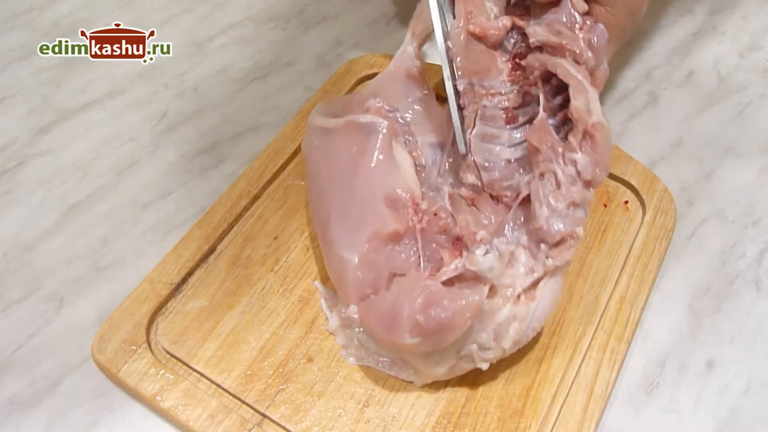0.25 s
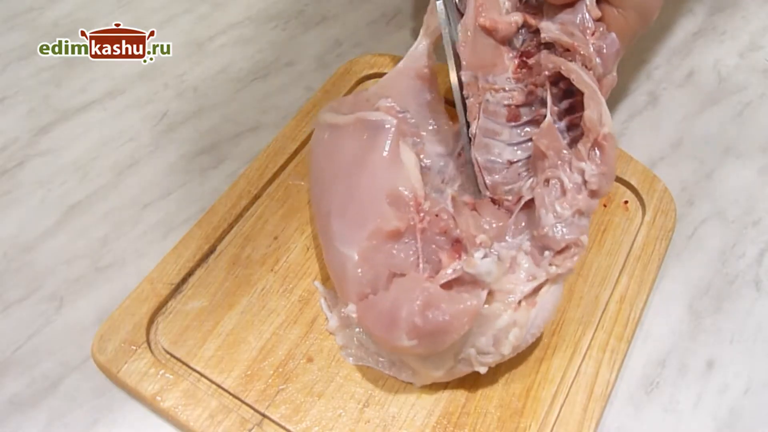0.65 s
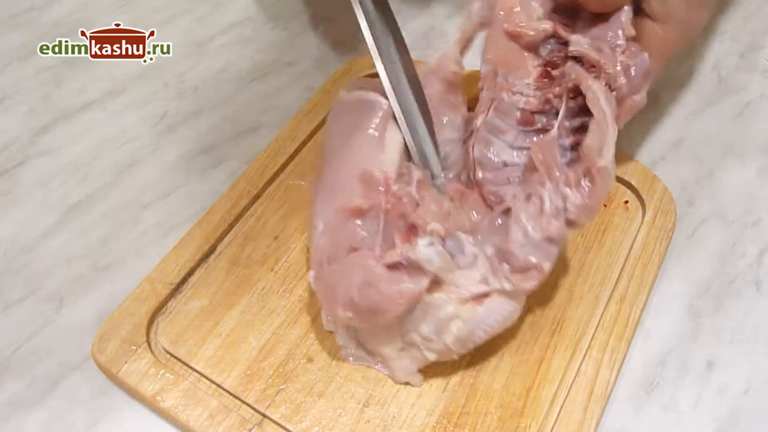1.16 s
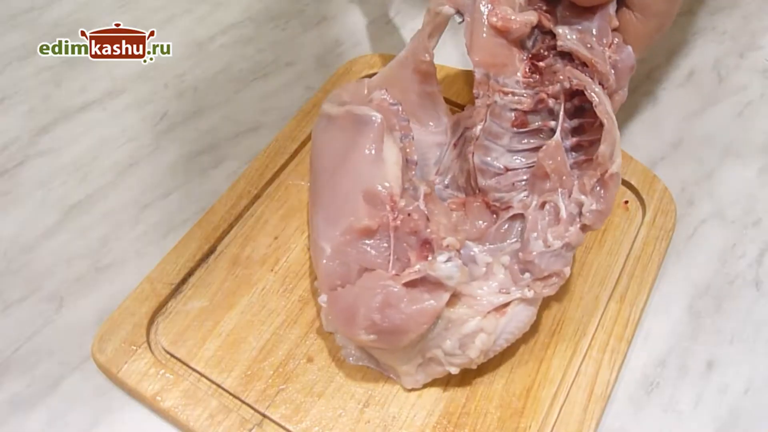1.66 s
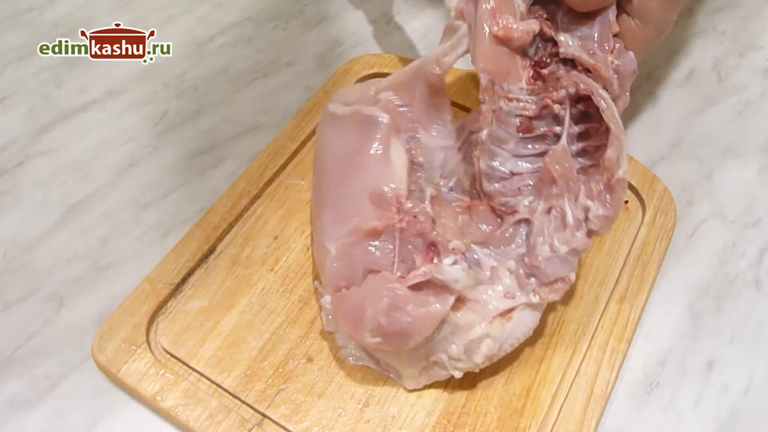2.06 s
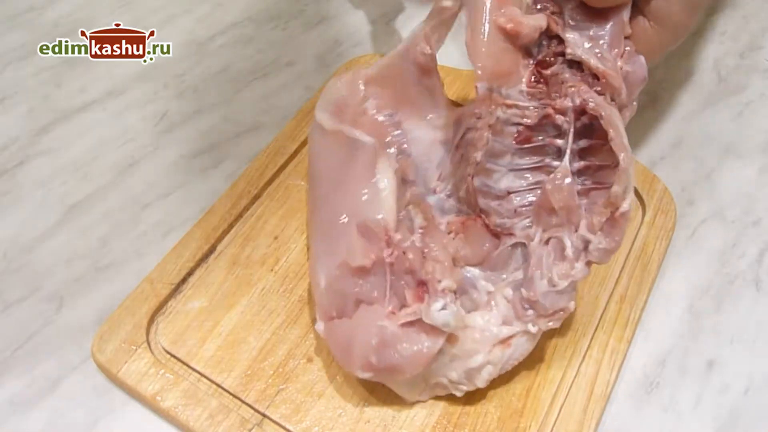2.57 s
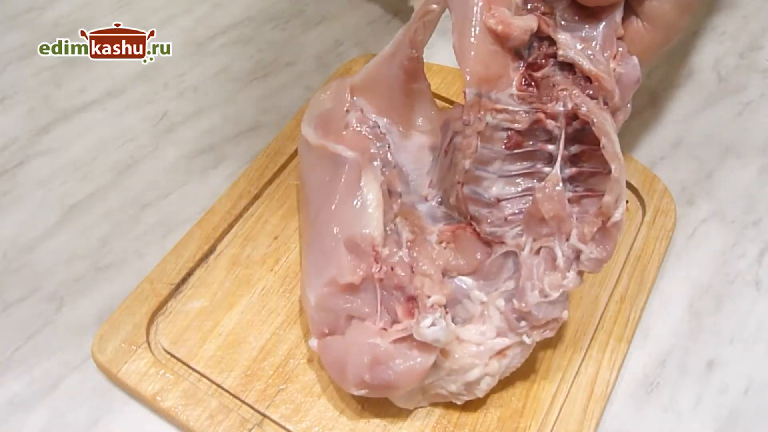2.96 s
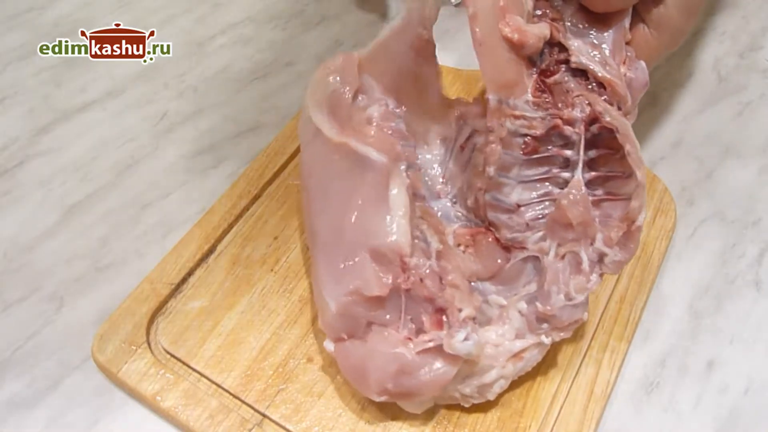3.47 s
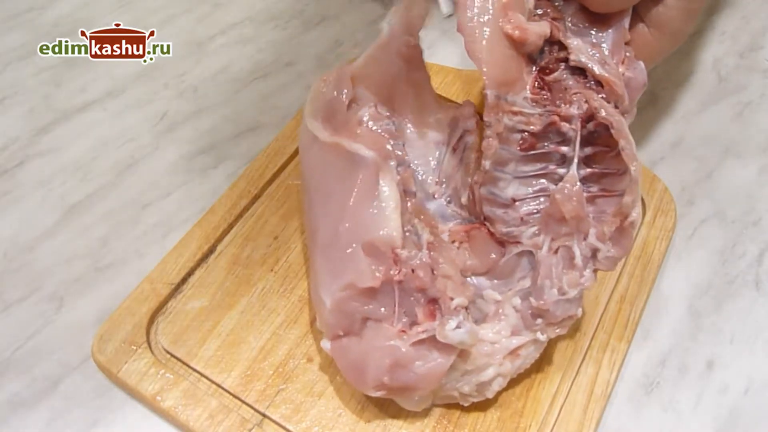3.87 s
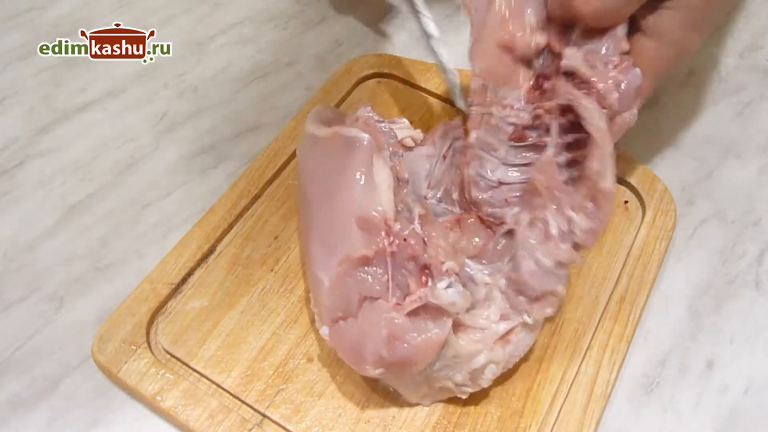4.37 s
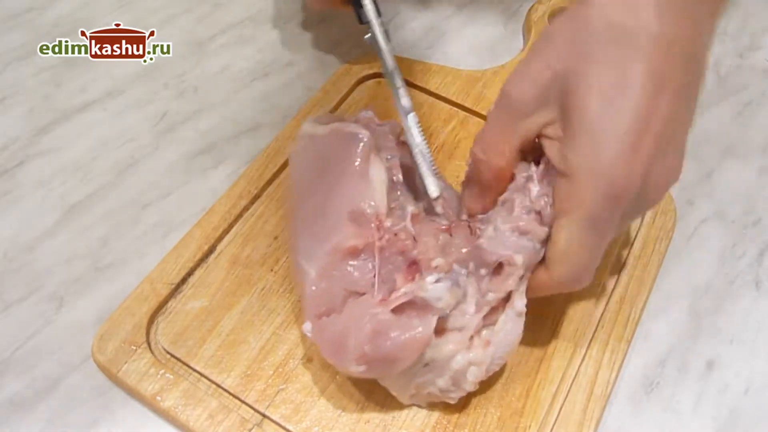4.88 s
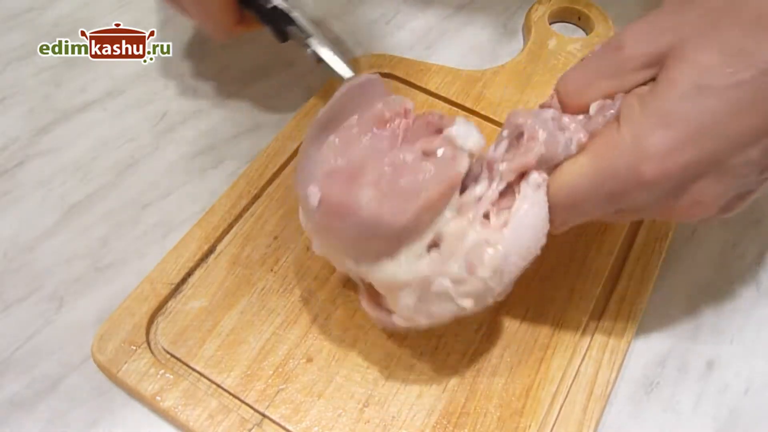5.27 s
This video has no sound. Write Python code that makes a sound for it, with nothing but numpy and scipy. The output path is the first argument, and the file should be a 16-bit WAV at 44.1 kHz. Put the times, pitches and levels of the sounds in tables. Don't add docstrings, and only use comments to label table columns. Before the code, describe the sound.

Kitchen scissors crunch loudly through raw chicken ribs in a hard, live kitchen, then wet flesh is pulled apart with small pops and crackles.

```python
import sys
import numpy as np
from scipy import signal
from scipy.fft import rfft, irfft
from scipy.io import wavfile
from scipy.ndimage import uniform_filter1d

SR = 44100
rng = np.random.default_rng(int(sys.argv[2]) if len(sys.argv) > 2 else 0)


def amplitude_ratio(level_db):
    exponent = np.asarray(level_db, float) / 20
    return 10 ** exponent


def wav_record(signal):
    frames = np.transpose(np.atleast_2d(signal))
    bounded = np.clip(frames, -1, 1)
    quanta = np.round(bounded * 32767).astype(np.int16)
    wavfile.write(sys.argv[1], SR, quanta)


N = 243414


def evened(x):
    return x / np.sqrt(np.mean(x ** 2) + 1e-20)


def read(points, hz):
    f, value = np.transpose(points)
    return np.interp(np.log(hz + 1), np.log(f + 1), value)


def add(mix, s, sound):
    part = mix[..., round(s * SR):][..., :sound.shape[-1]]
    part += sound[..., :part.shape[-1]]


def resonate(x, hz, width):
    pole = np.exp((2j * np.pi * hz - np.pi * max(width, 5)) / SR)
    return 2 * signal.lfilter([1 - abs(pole)], [1, -pole], x).real


def slow(hz):
    return evened(signal.lfilter([1], [1, -np.exp(-2 * np.pi * hz / SR)], rng.standard_normal(N)))


def whitened(x, bins):
    spectrum = rfft(x)
    return irfft(spectrum / np.sqrt(uniform_filter1d(abs(spectrum) ** 2, size=bins)))


def swell(source, start, top, end, db, start_db, end_db):
    at = np.arange(round(start * SR), min(round(end * SR), N))
    level = db + np.interp(at / SR, [start, top, end], [start_db, 0, end_db])
    return source[at] * amplitude_ratio(level) * signal.windows.tukey(len(at), .3)


def causal(shared, low_hz, low_db, high_hz, high_db, thud_db, deep_db, treble_db, upper_hz, upper_db, size=1024):
    low_oct, high_oct, thud_hz, deep_hz, treble_hz = 0.28, 0.19, 800, 150, 7220
    hz = abs(np.fft.fftfreq(4 * size, 1 / SR)) + 1
    db = read(shared, hz) + thud_db / (1 + (hz / thud_hz) ** 2)
    db = db + deep_db / (1 + (hz / deep_hz) ** 2) + treble_db / (1 + (treble_hz / hz) ** 14)
    rings = [(low_hz, low_db, low_oct), (high_hz, high_db, high_oct), (upper_hz, upper_db, high_oct)]
    for ring_hz, ring_db, octaves in rings:
        db = db + ring_db * np.exp(-(np.log2(hz / ring_hz) / octaves) ** 2)
    log_gain = np.log(amplitude_ratio(np.maximum(db, -70)))
    return np.fft.ifft(np.exp(np.conj(signal.hilbert(log_gain)))).real[:size]


# t/s, peak level/dB, fracture length/ms, room share level/dB, left-right level/dB
FRACTURES = [
    (0.5962, -0.16, 4.04, -7, 0),
    (0.9264, -1.75, 3.47, -6, 1),
    (1.9325, -1.5, 3.5, -6.5, -0.7),
    (2.6774, -9, 1.18, -14, -4),
    (3.515, -8.5, 3.5, -7.5, 1.5),
    (3.9102, -1, 3.44, -8, 1.5),
    (0.2675, -22, 4.1, -9.5, -0.5),
    (4.5303, -26.5, 0.89, -4.5, -0.5),
    (5.2524, -15, 2.9, -12, -5),
]
# f/Hz, level/dB per Hz
CRACK_COLOUR = [(24, -62), (40, -38.5), (500, -18.5), (1300, -15.5), (2750, -13.5), (5500, -9), (7500, -6),
                (10100, -39)]
# low ring f/Hz, level/dB, high ring f/Hz, level/dB, thud level/dB
CRACK_RINGS = [(3000, 12, 4230, 18, 14), (2130, 10.5, 3400, 9, -7), (1570, 7.5, 4400, 7.5, -1.5),
               (1980, 12, 3290, 10.5, 8.5), (2030, 11, 4600, 9, -16.5), (2220, 7, 4340, 15.5, -0.5),
               (1000, 9.5, 3700, 8.5, 19.5), (1780, 32, 2860, 22, 25), (1270, 8, 3660, 9.5, 12.5)]
# f/Hz, level/dB per Hz
RIB_COLOUR = [(300, -60), (650, -45), (1100, -21.5), (1600, -14), (2750, -18.5), (4000, -6.5), (7700, -14),
              (10000, -46.5)]
# low ring f/Hz, level/dB, high ring f/Hz, level/dB, thud level/dB
RIB_RINGS = [(1920, 4.5, 4200, 7, -2.5), (2100, 6.5, 3700, 3.5, -1), (1920, 6, 4320, 3.5, -5.5),
             (2700, 17, 4200, -3, 49.5), (1905, 7.5, 5300, 5.5, 0.5), (2200, 5, 4500, 3, 2),
             (1200, 8, 2700, 5, 40.5), (1385, 29, 2050, 25, 14.5), (1500, 2, 4300, 0, 23)]
# deep bass level/dB, crack treble level/dB, rib treble level/dB, upper ring f/Hz, level/dB
FRACTURE_EDGES = [(6.5, -6, -3.5, 7000, 9), (3.5, 4, -1, 4700, 4.5), (-16, -5.5, 1.5, 7500, 5.5),
                  (-43, -28.5, -6, 4900, 9), (-2, 2, -1, 6400, 3.5), (4, -2.5, 0.5, 6600, 5),
                  (-35.5, -17, -2, 4900, 5.5), (-23.5, -30, -10, 4800, -13), (-30, -17, -8, 5600, 10)]
# f/Hz, width/Hz, level/dB
STEEL_MODES = [(2270, 70, -9.5), (3690, 110, -6.5), (4330, 45, -2.5), (5190, 38, -7.5), (5880, 130, -2.5),
               (6190, 40, -7), (6800, 75, -3)]


def snaps():
    bounce_db, bounce_ms = -15, (.5, .8)
    near, far = np.zeros((2, N)), np.zeros(N)
    t = np.arange(2048) / SR
    for row, crack, rib, edges in zip(FRACTURES, CRACK_RINGS, RIB_RINGS, FRACTURE_EDGES):
        s, db, length_ms, wet_db, pan_db = row
        deep_db, treble_db, rib_db, upper_hz, upper_db = edges
        u = t * 1000 / length_ms
        noise = rng.standard_normal(len(t)) * np.minimum(u * 9, 1) * np.exp(-.6 * u - u ** 5)
        burst = whitened(noise, 15)[:len(t) // 2]
        sound = np.convolve(burst, causal(CRACK_COLOUR, *crack, deep_db, treble_db, upper_hz, upper_db))
        ms = np.arange(len(sound)) / SR * 1000
        sound *= np.exp(-(ms / (1.6 * length_ms)) ** 4)
        sound *= amplitude_ratio(min(db, -.6)) / abs(band_edge(sound)).max()
        bounce = amplitude_ratio(bounce_db) * np.array([np.roll(sound, round(d * SR / 1000)) for d in bounce_ms])
        add(near, s, (sound + bounce) * amplitude_ratio([[min(pan_db, 0)], [min(-pan_db, 0)]]))
        ring = causal(RIB_COLOUR, *rib, 0, rib_db, upper_hz, 0.54 * upper_db, size=len(t))
        ring = ring + sum(amplitude_ratio(g + 6.5) * resonate(ring, f, w) for f, w, g in STEEL_MODES)
        add(far, s, amplitude_ratio(wet_db) * ring * np.linalg.norm(sound) / np.linalg.norm(ring))
    return near, far


# start t/s, contact t/s, end t/s, high song level/dB, 2.4 kHz song relative
# level/dB
BITES = [
    (0.559, 0.58, 0.64, -44.5, 1),
    (0.873, 0.896, 0.98, -48.5, -7.5),
    (1.859, 1.904, 1.932, -43.5, -10),
    (3.863, 3.892, 3.904, -44.5, -5.5),
]
# start t/s, hardest t/s, end t/s, high song level/dB, 2.4 kHz song relative level/dB
STROKES = [
    (0.05, 0.081, 0.2, -56, -1.5),
    (0.185, 0.212, 0.3, -53, -0.5),
    (0.252, 0.257, 0.28, -52, -4),
    (0.339, 0.375, 0.43, -51, -9.5),
    (.72, 0.74, .81, -48, -7),
    (3.342, 3.41, 3.455, -49, -6.5),
    (3.401, 3.407, 3.435, -47, -8),
    (4.049, 4.098, 4.12, -48.5, -6.5),
]
# f/Hz, width/Hz, level/dB
BLADE_MODES = [(4680, 170, 1.5), (5774, 150, 4), (6070, 550, -4.5), (6250, 50, -7.5), (7040, 82, -14.5)]


def strokes():
    grit = rng.standard_normal(N) * amplitude_ratio(2.7 * slow(150))
    modes = sum(amplitude_ratio(db + 0.77 * slow(25)) * resonate(grit, hz, 1.2 * w) for hz, w, db in BLADE_MODES)
    high = evened(modes + 0.055 * grit + .25 * resonate(grit, 3800, 700))
    song = evened(resonate(grit, 2370, 140) * amplitude_ratio(3.6 * slow(24)))
    scrape = evened(resonate(resonate(grit, 1000, 700), 1000, 820))
    out = np.zeros(N)
    follow, scrape_db = .7, -62.5
    for rows, start_db, end_db in [(STROKES, -21, -19), (BITES, -24, 4.5)]:
        for *span, db, song_db in rows:
            add(out, span[0], swell(high, *span, db, start_db, end_db))
            add(out, span[0], swell(scrape, *span, scrape_db, -6.5, -2))
            add(out, span[0], swell(song, *span, db + song_db, follow * start_db, follow * end_db))
    return out


def impacts(rows, t60, share, air):
    out, t = np.zeros(N), np.arange(1500) / SR
    fade = amplitude_ratio(-30 * t / np.clip(t60, .003, .05))
    for s, db, hz, knock_db in rows:
        noise = rng.standard_normal(len(t))
        burst = whitened(noise * fade * np.minimum(t / (0.046 * t60), 1), 9)
        mode = resonate(resonate(burst, hz, share * hz), hz, 1.4 * share * hz)
        body = fade * (mode + air * np.diff(burst, prepend=0))
        knock = fade * resonate(resonate(burst, 950, 1000), 820, 690)
        sound = body / abs(body).max() + amplitude_ratio(knock_db - 2.5) * knock / abs(knock).max()
        add(out, s, amplitude_ratio(db - 1.5) * sound)
    return out


# t/s, peak level/dB, f/Hz, low knock level/dB
BONE_TICKS = [(.106, -31, 2370, -2), (.11, -30, 2270, -4.5), (.148, -33, 1790, -23),
              (.216, -31.5, 2380, -27), (0.2596, -27, 1000, -9), (0.2632, -22.5, 3500, -27),
              (.305, -39.5, 4000, -11), (.426, -33.5, 1900, -21), (0.572, -25, 4300, -8.5),
              (1.165, -43, 1630, -19), (1.261, -35, 4690, -33.5), (1.609, -33.5, 4560, -11.5),
              (3.893, -23, 5130, -15.5), (4.414, -40.5, 4900, -15.5), (4.435, -41.5, 5800, -23.5),
              (4.505, -40, 6500, -22), (4.589, -34.5, 4270, -7.5), (4.764, -33.5, 1810, -36),
              (4.82, -46, 3140, -16), (4.8407, -26.5, 3000, -35), (4.912, -36, 1770, -10),
              (5.062, -35.5, 5520, -10), (5.144, -31, 3630, -11.5), (5.213, -35, 4900, -17),
              (5.445, -32, 3460, -8)]


def bone_ticks():
    return impacts(BONE_TICKS, t60=.016, share=0.94, air=0.055)


# t/s, peak level/dB, f/Hz, low knock level/dB
BLADE_PINGS = [(.228, -30.5, 5430, -2), (0.5799, -17.5, 6100, -10.5), (0.59, -35, 6400, 2),
               (.744, -42, 6230, -27), (0.782, -36, 6050, -20), (1.079, -37.5, 6300, -24.5),
               (1.665, -32, 5670, -23.5), (1.921, -28, 5840, -25), (2.223, -41.5, 4570, -13),
               (2.365, -37.5, 5910, -4.5), (3.408, -27.5, 4630, -27), (5.032, -24, 5500, -15),
               (5.133, -32.5, 5660, -8), (5.159, -33, 6200, -13), (5.196, -26.5, 7020, -36),
               (5.348, -38.5, 3800, -25), (4.155, -28, 3770, -28.5), (5.216, -30, 4700, -22),
               (.2165, -33, 5600, -19.5), (1.2607, -38, 4700, -30), (1.6098, -34.5, 4500, -30),
               (3.702, -46, 6000, -25.5), (3.378, -40, 6800, -30.5)]


def blade_pings():
    return impacts(BLADE_PINGS, t60=0.0099, share=0.19, air=0.035)


# t/s, peak level/dB, f/Hz
WET_POPS = [(4.424, -38.5, 3030), (4.85, -37, 3530), (4.862, -32.5, 3450), (4.885, -34.5, 3530),
            (4.902, -31, 5760), (4.943, -36, 4700), (4.952, -27.5, 6500), (4.956, -25, 4030),
            (5.028, -29.5, 4670), (5.096, -37, 3180), (5.106, -30, 4940), (5.117, -25, 3300),
            (5.249, -25.5, 5600), (5.467, -24, 7200), (4.93, -36, 3500), (5.014, -39, 3400),
            (5.047, -43, 6500), (5.076, -36, 2500), (5.089, -36, 4530), (5.168, -40, 7000),
            (5.176, -43, 7000), (5.184, -39, 5000), (5.239, -32, 6540), (5.463, -40, 2500),
            (5.514, -40, 5060), (.0625, -42, 4000), (.071, -40, 6500), (3.13, -46, 7000),
            (4.22, -46.5, 5550), (.555, -38.5, 6200)]


def wet_pops():
    return impacts([(*row, -31) for row in WET_POPS], t60=0.013, share=0.56, air=0.11)


# t/s, crackle level/dB
PULLS = [
    [(1.05, -52.5), (1.2, -54)],
    [(4.38, -62.5), (4.7, -61.5)],
    [(4.8, -67.5), (5.078, -49), (5.52, -63)],
]


def crackle():
    t, pops = np.arange(300) / SR, np.zeros(N)
    for hz in np.geomspace(2200, 7400, num=14):
        happens = rng.random(N) < 150 / SR
        size = amplitude_ratio(4.7 * np.minimum(rng.exponential(1, N), 4)) * happens
        pops += signal.oaconvolve(size, np.sin(2 * np.pi * hz * t) * np.exp(-t * hz / 3.0))[:N]
    level = np.zeros(N)
    for rows in PULLS:
        s, db = np.transpose(rows)
        t = np.arange(s[0], s[-1], 1 / SR)
        add(level, s[0], amplitude_ratio(np.interp(t, s, db)) * signal.windows.tukey(len(t), .06))
    rustle = evened(resonate(rng.standard_normal(N), 4900, 3500)) * amplitude_ratio(7.6 * slow(60))
    return level * (evened(pops) + 0.35 * rustle)


# start t/s, hardest t/s, end t/s, rumble level/dB
DRAGS = [
    (0.716, .738, 0.816, -53),
    (1.06, 1.08, 1.1, -63),
    (3.68, 3.716, 3.72, -56),
    (4.59, 4.598, 4.6, -48.5),
    (5.274, 5.28, 5.34, -56.5),
    (5.4, 5.493, 5.46, -56),
]
# start t/s, loudest t/s, end t/s, level/dB
SQUEAKS = [
    (1.115, 1.166, 1.2, -54.5),
    (3.674, 3.71, 3.735, -58.5),
    (4.203, 4.236, 3.84, -53.5),
    (4.384, 4.411, 4.424, -56.5),
    (4.57, 4.594, 4.2, -69),
    (4.93, 5.045, 5.09, -56),
    (5.422, 5.5, 5.4, -59),
]


def board():
    noise, out = rng.standard_normal((2, N)), np.zeros(N)
    body = resonate(resonate(noise[0], 590, 450), 550, 350)
    rumble = evened(body + 0.37 * resonate(noise[0], 190, 70))
    squeak = evened(resonate(resonate(noise[1], 1120, 60), 1190, 150))
    for source, rows, edge_db in [(rumble, DRAGS, -7.5), (squeak, SQUEAKS, -6.5)]:
        for row in rows:
            add(out, row[0], swell(source, *row, edge_db, edge_db))
    return out


# f/Hz, t60/s
ROOM_DECAY = [(400, 0.39), (1300, 0.37), (3500, 0.28), (7000, 0.27)]


def kitchen(x):
    taps = np.zeros((3, SR // 2))
    starts = np.arange(250, SR // 2 - 20, 20)
    at = starts + rng.integers(0, 20, (3, len(starts)))
    np.put_along_axis(taps, at, rng.choice([-1., 1.], at.shape), 1)
    hz, t, z = signal.stft(taps[:2] + 1.3 * taps[2], SR, nperseg=128)
    decay = amplitude_ratio(-60 * t / read(ROOM_DECAY, hz)[:, None])
    tail = signal.istft(z * decay * np.minimum(t / 0.0059, 1), SR, nperseg=128)[1]
    return signal.fftconvolve(x[None], tail / np.linalg.norm(tail[0]), axes=1)[:, :N]


# f/Hz, level/dB per Hz
HISS_COLOUR = [(30, -66), (200, -15), (400, -5.5), (1160, -5), (1840, -8.5), (4790, -13), (7800, -23),
               (10100, -61)]
# f/Hz, correlation [-1 to 1]
HISS_LIKENESS = [(60, 0.18), (160, 0.45), (430, -0.06), (1150, -0.58), (3090, -0.63), (8290, -0.54)]


def hiss():
    frames, hz = N // 256 + 5, np.fft.rfftfreq(1024, 1 / SR)
    a, b, c, d, patches = rng.standard_normal((frames, 513, 5)).T
    patches = evened(uniform_filter1d(uniform_filter1d(patches, size=10, axis=0), size=12, axis=1))
    same = np.clip(read(HISS_LIKENESS, hz), -1, 1)[:, None]
    left = a + 1j * b
    z = np.array([left, same * left + np.sqrt(1 - same ** 2) * (c + 1j * d)])
    z *= amplitude_ratio(read(HISS_COLOUR, hz)[:, None] + 1.4 * patches)
    return amplitude_ratio(-55.5 + 4) * evened(signal.istft(z, nperseg=1024, noverlap=768)[1][:, :N])


# f/Hz, level/dB
DRONE_TONES = [(289, -69.5), (398, -75.5), (498, -71.5)]


def drone():
    return sum(amplitude_ratio(db) * evened(resonate(rng.standard_normal(N), f, 14)) for f, db in DRONE_TONES)


def scene():
    near, far = snaps()
    rub, wet = strokes(), crackle()
    small = bone_ticks() + blade_pings() + wet_pops()
    send = far + amplitude_ratio(-8.0) * small + amplitude_ratio(-7) * rub + amplitude_ratio(-19) * wet
    close = small + amplitude_ratio(3) * rub + amplitude_ratio(-5.5) * wet
    light = signal.butter(N=2, Wn=260, btype="high", fs=SR, output="sos")
    heavy = signal.butter(N=2, Wn=120, btype="high", fs=SR, output="sos")
    room = kitchen(signal.sosfilt(light, send))
    contact = signal.sosfilt(light, close) + signal.sosfilt(heavy, board())
    return near + contact * amplitude_ratio([[-.4], [.4]]) + room + hiss() + drone()


def band_edge(x):
    edge = signal.firwin(301, 7660, window=("kaiser", 8), fs=SR)
    leak = signal.firwin(301, 9526, window=("kaiser", 8), fs=SR) + .1 * signal.unit_impulse(301, "mid")
    return signal.oaconvolve(np.atleast_2d(x), (edge + amplitude_ratio(-39.5) * leak)[None], "same")


def low_pass(x):
    return signal.sosfilt(signal.butter(12, 8890, fs=SR, output="sos"), x)


def record(dry):
    mix = band_edge(dry)
    return low_pass(mix)


dry = scene()
out = record(dry)
wav_record(out)
```